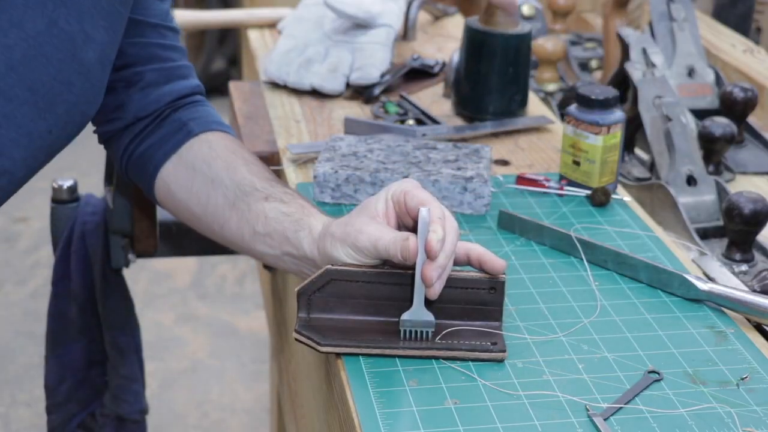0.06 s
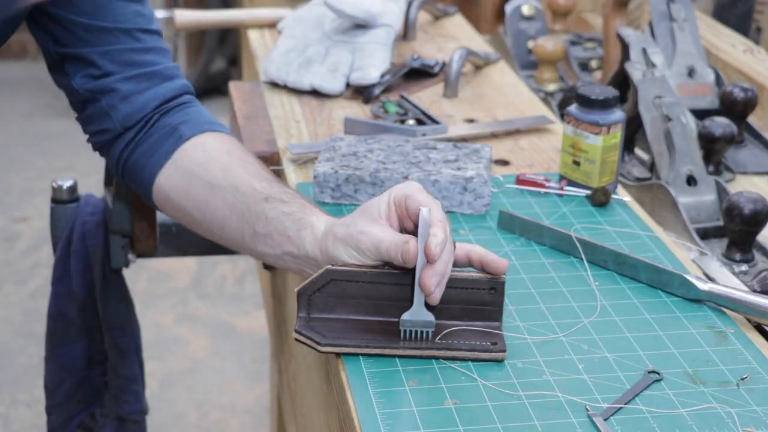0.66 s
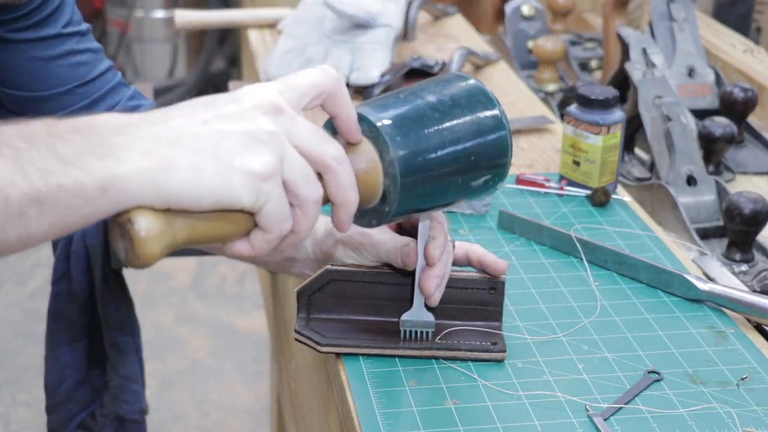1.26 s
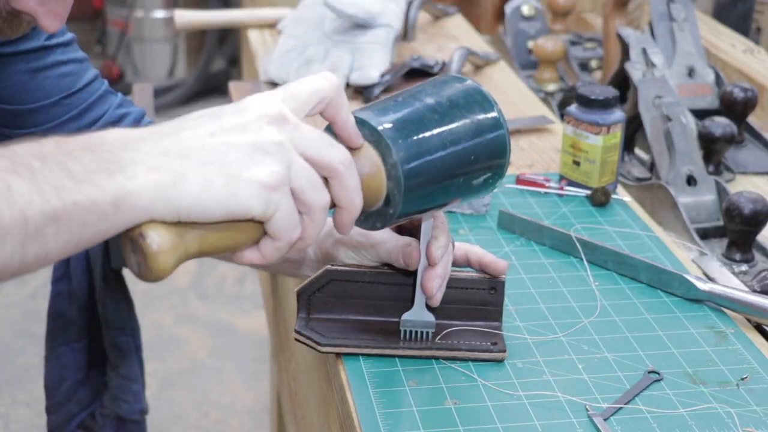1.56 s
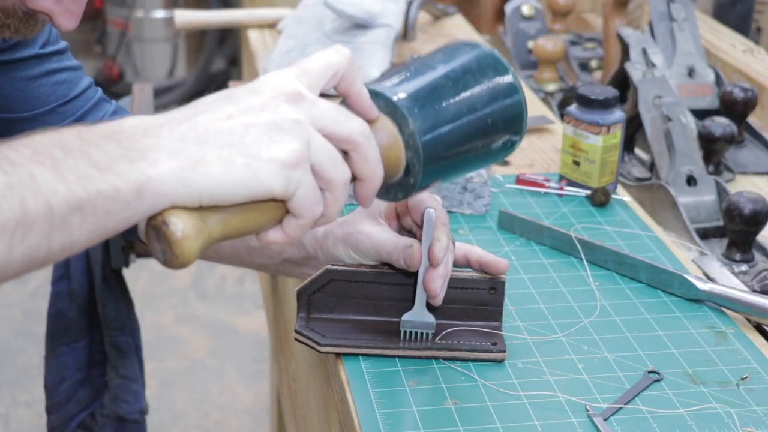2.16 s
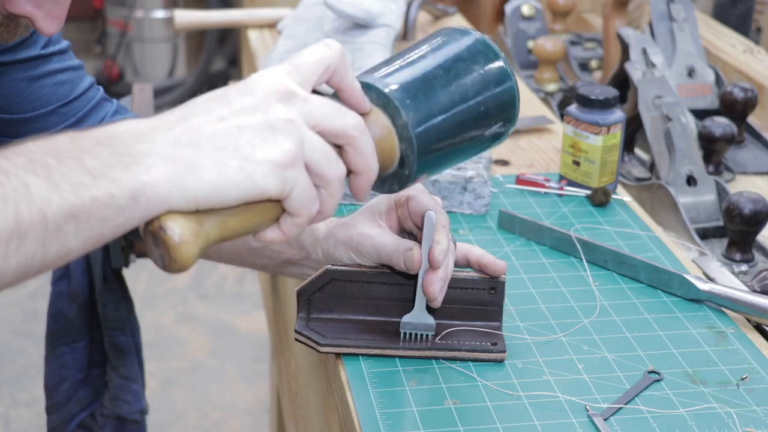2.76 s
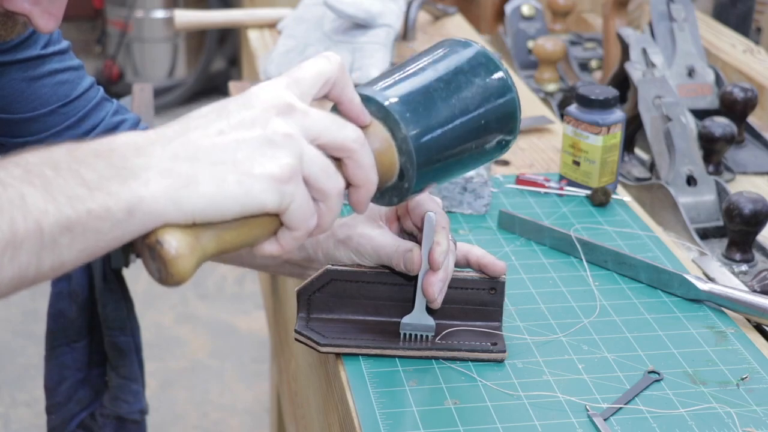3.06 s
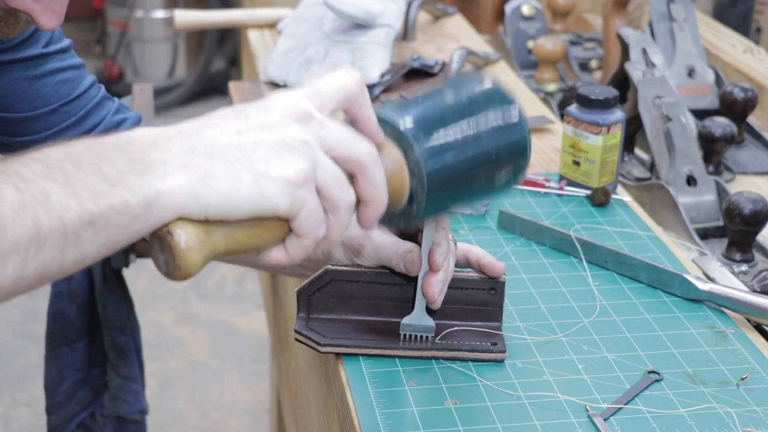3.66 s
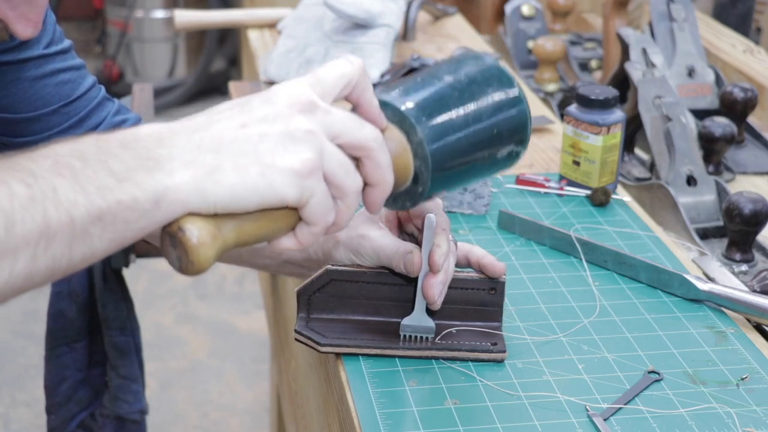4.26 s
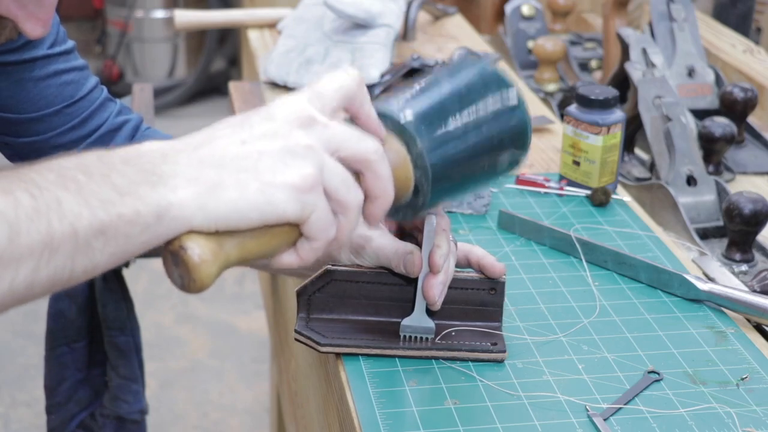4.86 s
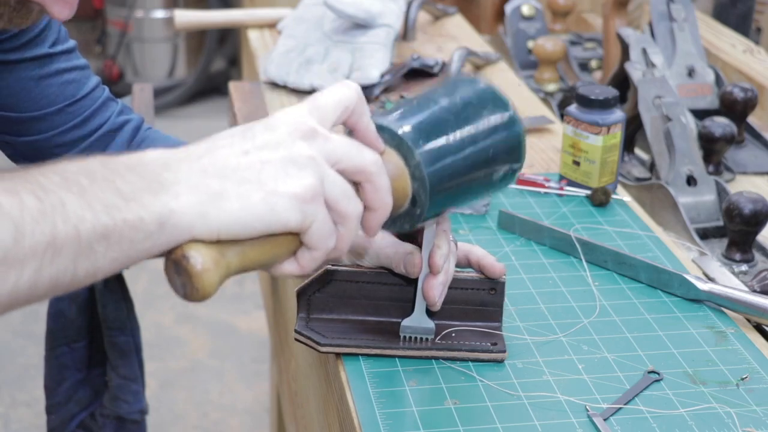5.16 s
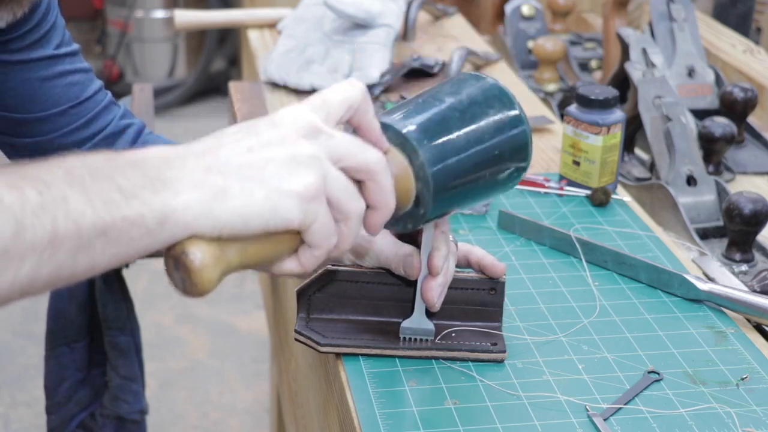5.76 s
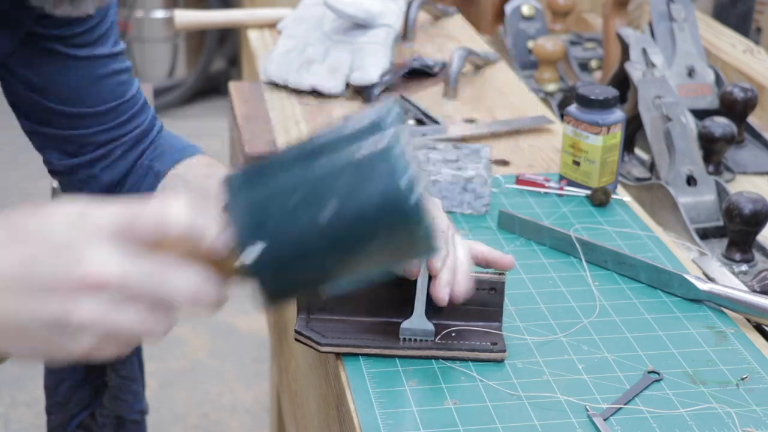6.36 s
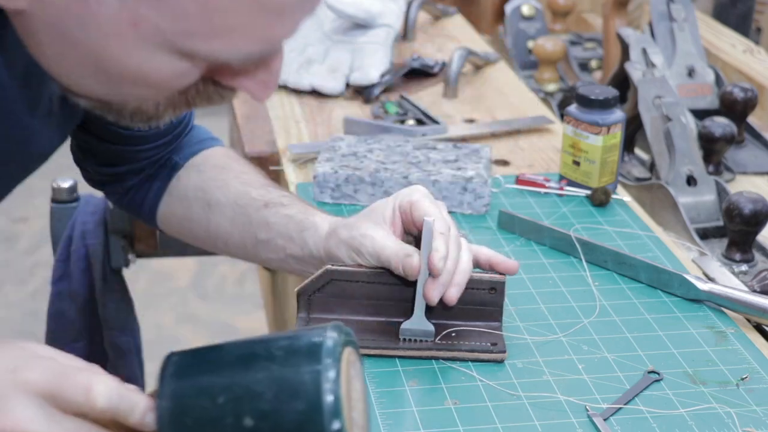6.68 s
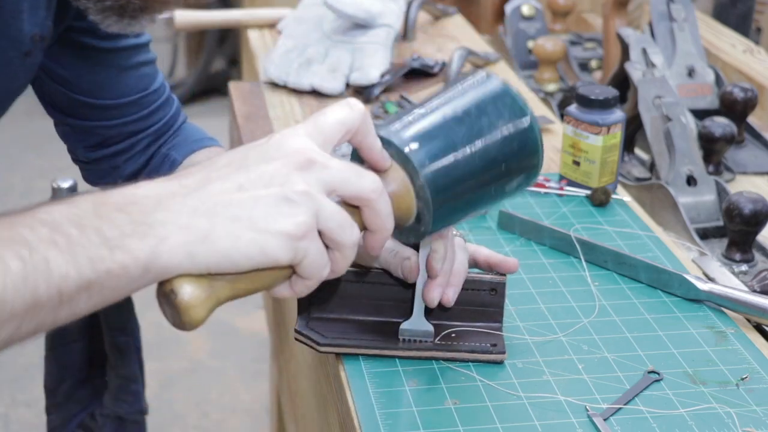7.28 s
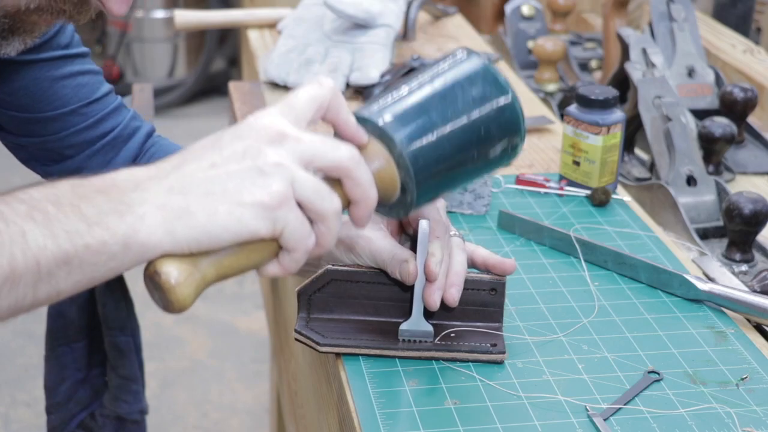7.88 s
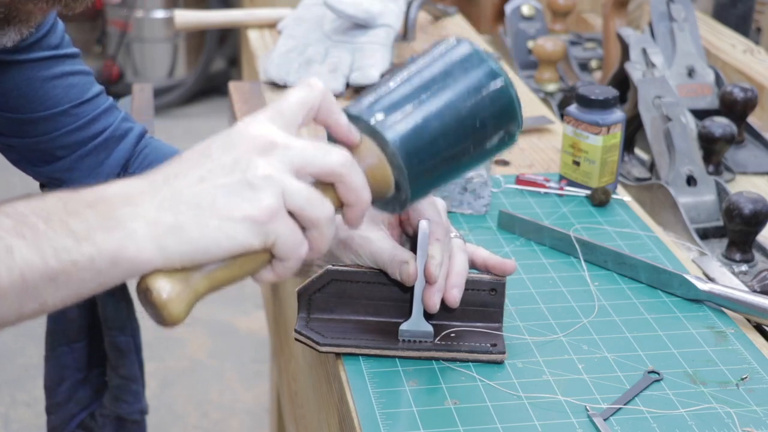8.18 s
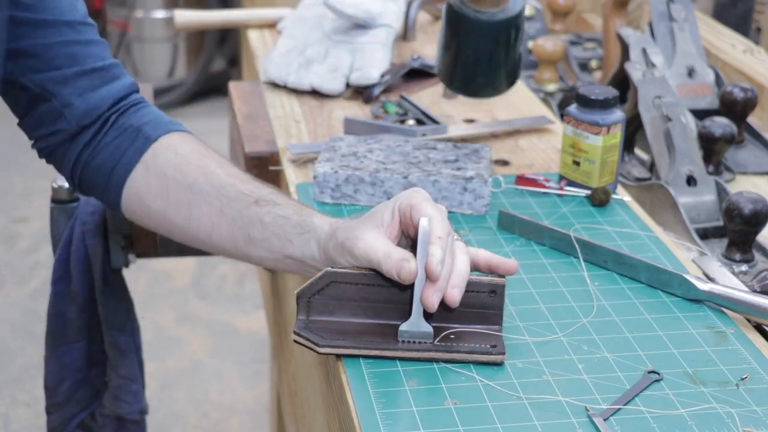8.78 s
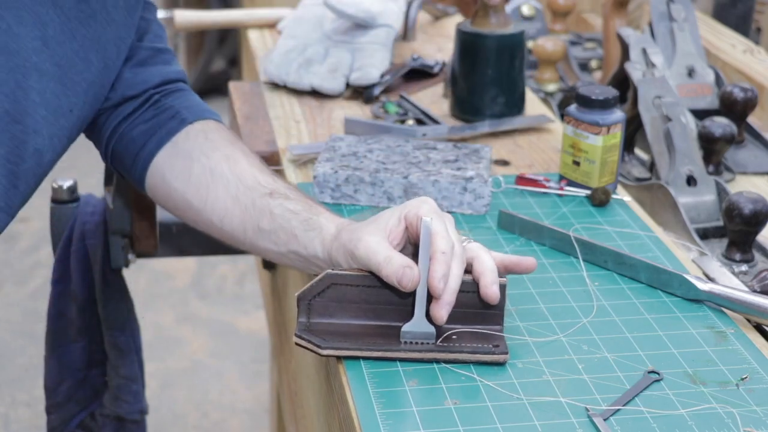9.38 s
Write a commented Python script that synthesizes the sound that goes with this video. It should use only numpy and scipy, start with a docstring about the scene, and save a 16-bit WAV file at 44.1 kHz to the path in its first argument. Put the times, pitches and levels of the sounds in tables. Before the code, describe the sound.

Sharp, steady mallet knocks on a chisel rattle tools on a wooden bench; four duller taps follow before the mallet is set down.

```python
"""A plastic-faced mallet taps a stitching chisel through leather: a long even run, a pause, four more.
Each impact excites damped modes of the chisel and the wooden workbench. As the prongs sink in, the bench
takes more of the blow and loose steel tools chatter on it; the hardest taps overload the microphone.
Friction makes sleeves rustle and the grip creak; at the end the mallet is set down among the tools.
The workshop reverberates, over steady room air and a low mains hum."""
import sys
import numpy as np
from scipy import signal
from scipy.fft import rfft, irfft, next_fast_len
from scipy.io import wavfile
from scipy.ndimage import uniform_filter1d

SR = 44100
rng = np.random.default_rng(int(sys.argv[2]) if len(sys.argv) > 2 else 0)


def wrap_up_sound(samples):
    """Save the sound to the file named by the first command line argument, as 16-bit audio."""
    columns = np.atleast_2d(samples).T
    # keep every value between -1 and 1, then stretch to whole-number steps
    tamed = np.clip(columns, -1, 1)
    steps = np.round(tamed * 32767).astype(np.int16)
    wavfile.write(sys.argv[1], SR, steps)


N = 420273

# mallet blows: t/s, force/dB, softness of the contact/dB
TAPS = [(1.3745,-22.5,-0.5), (1.6055,-13.5,-1), (1.8473,-12.5,0.5), (2.0886,-5,0), (2.3627,-2,-0.5),
        (2.6337,-1.5,-.5), (2.938,0,0.5), (3.227,-1.5,2), (3.4878,-.5,.5), (3.7501,-1.24,3), (3.9893,0,3),
        (4.2399,0.94,2.5), (4.4796,.5,2.5), (4.7186,-0.7,3), (4.9629,0.5,0), (5.23,0.17,1),
        (5.512,-0.64,2.5), (5.7893,-0.43,2), (6.0615,1,-1), (7.379,-9.5,7.5), (7.6445,-5,4), (7.892,-2,5.5),
        (8.1445,-2.5,5)]
# relative level of each part: base/dB, then dB per dB of force, per dB of softness, per thickness sunk
KNOCK_LAW = (0.5, 0.94, -0.39, -0.81)
CRACK_LAW = (1.47, 1.75, -0.55, -0.18)
CLICK_LAW = (-1, 2.5, -0.7, -5)
THUMP_LAW = (-19.5, 0.78, 1.44, 1.2)
CLATTER_LAW = (-25, 1.65, 0.12, 9)
JINGLE_LAW = (-45.5, 1, 0.55, 8.5)


def taps(sink_per_tap=0.077):
    """Impact excitation: each blow sinks the prongs and passes more energy to the bench and tools."""
    out, walls = np.zeros(N), room_tail()
    depth = 0  # in leather thicknesses: beyond 1 the prongs enter the mat below
    laws = np.array([KNOCK_LAW, CRACK_LAW, CLICK_LAW, THUMP_LAW, CLATTER_LAW, JINGLE_LAW])
    for s, force_db, softness_db in TAPS:
        depth += sink_per_tap * amp(force_db)
        levels = laws @ [1, force_db, softness_db, depth]
        knock_db, crack_db, click_db, thump_db, clatter_db, jingle_db = levels
        add(out, s, in_room(chisel(knock_db, crack_db, depth), walls, wet_db=-9))
        add(out, s, overload_click(click_db, depth))
        add(out, s, in_room(bench(thump_db, knock_db, depth), walls, wet_db=-16))
        add(out, s, in_room(chatter(clatter_db, jingle_db), walls, wet_db=-1))
    return out


# modes of the mallet head on the hand-damped chisel: f/Hz, level/dB, T60/s
CRACK_MODES = [(840, -11.5, 0.0077), (1050, -2.5, 0.0042), (1326, 0, 0.0077), (1543, 1, 0.0098),
               (1903, -12.5, 0.009), (2730, -4, 0.0055), (4380, -3.5, 0.0023), (5280, -17.5, 0.0074)]


def chisel(knock_db, crack_db, depth, contact_s=0.00041):
    """Damped free vibration: a hollow knock and a short crack build up over the contact time."""
    t = ring_time()
    knock_hz = 593 - 36 * depth
    knock = amp(knock_db - 1) * ring([(knock_hz, 0, 0.022)], scatter_db=0)
    pitch = 1 - 0.55 * max(depth - 1, 0)  # the crack drops as the prongs enter the mat
    tilt = max(0.32 * crack_db, -4)  # dB/octave: a harder contact is shorter and brighter
    modes = [(hz * pitch, db + tilt * np.log2(hz / 1300), t60) for hz, db, t60 in CRACK_MODES]
    crack = amp(crack_db + 2) * ring(modes, scatter_db=5)
    return (crack - knock) * (1 - np.exp(-(t / contact_s) ** 2))


# bright partials of the overload click: f/Hz, level/dB, T60/s
CLICK_PARTIALS = [(3960, -15, 0.0039), (8750, -4.5, 0.00082), (13800, -27, 0.0011)]


def overload_click(click_db, depth, fade_depth=0.095, late_db=-21.5):
    """Overload: a sharp, bright click on the hardest taps, weaker on the later ones."""
    late = np.clip((depth - 1) / fade_depth, 0, 1)
    return amp(click_db + late_db * late + 2.5) * ring(CLICK_PARTIALS, scatter_db=2)


# the bench top yielding under the prongs: f/Hz at zero depth, level/dB, T60/s
PUSH_MODES = [(127, -8, 0.05), (142.4, 4, 0.077)]
# long modes of the bench, the five booming ones first: f/Hz, level/dB, T60/s
BENCH_MODES = [(118, 3, .32), (131, -5, .15), (187, -7, .2), (217, -13, .22), (312, -9, .22),
               (274, -13, .2), (420, -9, .3), (522, -9, .3), (565, -1, .33), (619, -2, .3), (707, -11, .3),
               (952, -9, .33), (1141, -10, .3), (1160, -11, .33), (1239, -14, .3), (1374, -14, .3),
               (1579, -13, .3)]


def bench(thump_db, knock_db, depth, low_cut_hz=110, boom_limit_db=-17):
    """Plate vibration: the top yields, more stiffly as the prongs sink, and rings in its long modes."""
    pitch = 1 + 0.2 * depth
    stiffened = [(hz * pitch, db, t60) for hz, db, t60 in PUSH_MODES]
    push = amp(thump_db + 3.5) * ring(stiffened, scatter_db=2)
    boom_db = min(thump_db, boom_limit_db)  # leaning on the bench damps a bigger boom
    boom = amp(boom_db - 0.5) * ring(BENCH_MODES[:5], scatter_db=0.5)
    wood = amp(knock_db - 26) * ring(BENCH_MODES[5:], scatter_db=4)
    top = -(push + boom + wood) * (1 - np.exp(-ring_time() / 0.005))
    radiation = signal.butter(2, low_cut_hz, 'high', fs=SR, output='sos')
    return signal.sosfilt(radiation, top)  # an open plank radiates no deep bass


# tool bodies knocking on the wood: f/Hz, spectral level/dB
CLATTER_SPECTRUM = [(120, -30), (200, -13), (300, -5), (420, -2), (560, 0), (900, 0), (1300, -6),
                    (2000, -14), (3000, -19), (4800, -26), (7200, -38), (16000, -56)]
# resonances of the loose steel tools: f/Hz, bandwidth/Hz, level/dB
STEEL_RESONANCES = [(3140, 190, 13.5), (3800, 200, -13.5), (4720, 280, 7.5), (5630, 690, 9),
                    (5500, 120, -17.5), (6040, 160, -8.5), (7500, 37, -6), (8516, 30, -37), (9200, 500, -2),
                    (11300, 43, -25.5), (11000, 200, -11.5), (12430, 60, -21), (12600, 300, -21.5),
                    (13680, 310, -27)]


def chatter(clatter_db, jingle_db, delay_s=0.0049):
    """Contact rattle: loose tools jump with the bench and settle in a dense, uneven run of impacts."""
    t = ring_time()
    contacts = unit(amp(4 * flutter(len(t), span=130)))
    contacts *= 1 - np.exp(-(t / delay_s) ** 4)
    clatter = noise(CLATTER_SPECTRUM, len(t)) * contacts * fade(t, t60=0.13)
    tilt = 0.582 * min(jingle_db + 30, 0)  # dB/octave: tools that barely lift off land softly
    steel = lambda hz: resonances(STEEL_RESONANCES)(hz) * amp(tilt * np.log2(np.maximum(hz / 5000, 1)))
    strikes = rng.standard_normal(len(t)) * contacts * fade(t, t60=0.14)
    return amp(clatter_db + 5) * clatter + amp(jingle_db + 8.5) * filtered(strikes, steel)


# slides and squeaks of the mallet on the bench: peak t/s, level/dB, rise/s, fall/s
DRAGS = [(9.09, -29, .015, 0.061), (9.15, -19.5, .018, 0.015), (9.382, -17, .008, .04),
         (9.5, -24, 0.1, 0.068)]
SQUEAKS = [(9.119, -36.5, 0.0037, .005), (9.149, -25.5, .005, .006)]
# resonances that each excites: f/Hz, bandwidth/Hz, level/dB
DRAG_RESONANCES = [(345.3, 120, -3.5), (400, 66, 22.5), (770, 290, 21), (1076, 120, 12.5),
                   (1690, 250, -8.5), (2470, 170, 4), (3560, 170, -18), (4670, 250, -48), (5270, 350, -21),
                   (7200, 500, -39)]
SQUEAK_RESONANCES = [(5350, 300, 1), (7100, 400, -5), (9200, 350, -8)]


def mallet_slide(judder_db=4):
    """Sliding friction: the mallet drags and squeaks, driving resonances with noise."""
    slips = amp(judder_db * flutter(N, span=100)) * rng.standard_normal(N)
    scrape = unit(filtered(slips, resonances(DRAG_RESONANCES)))
    squeak = unit(filtered(rng.standard_normal(N), lambda hz: resonances(SQUEAK_RESONANCES)(hz) ** 2))
    return amp(-4) * swells(DRAGS) * scrape + swells(SQUEAKS) * squeak


# contacts of the mallet as it is set down: t/s, level/dB, T60/s
LANDINGS = [(9.078, -32, .06), (9.116, -26, .03), (9.138, -25, .03), (9.147, -22, .025), (9.168, -19, .04),
            (9.364, -14, .03), (9.371, -17, .03), (9.411, -12, .035), (9.429, -23, .02)]
# its wooden clack: f/Hz, spectral level/dB
CLACK_SPECTRUM = [(100, -43), (200, -14.5), (400, -10.5), (800, 1.5), (1250, -5.5), (2300, -6.5),
                  (3000, -10.5), (5200, -12.5), (6400, -20), (11000, -31.5), (16000, -59.5)]
# modes of the tools it hits: f/Hz, level/dB, T60/s
TOOL_MODES = [(958, -8, .25), (1240, -9, .12), (1700, -5, .15), (2110, -3, .15), (2410, -2, .18),
              (2650, -5, .18), (3365, -4, .22), (3680, -6, .22), (3935, -7, .25), (4468, -6, .16),
              (5012, -11, .18), (5480, -10, .1), (6616, -15, .14), (7806, -19, .22), (10050, -18, .17)]


def mallet_down(rise_s=0.00073):
    """Broadband impacts: head and handle clack down and set the neighbouring tools ringing."""
    out, t = np.zeros(N), ring_time()
    for s, db, t60 in LANDINGS:
        clack = amp(db + 7.5) * noise(CLACK_SPECTRUM, len(t)) * fade(t, t60)
        tools = amp(db - 12) * ring(TOOL_MODES, scatter_db=2)
        add(out, s, (clack + tools) * (1 - np.exp(-t / rise_s)))
    return out


# soft bumps on the bench: t/s, level/dB, cutoff f/Hz
BUMPS = [(0.122, -15, 430), (0.136, -31, 403), (0.166, -37, 300), (.636, -34, 600), (1.266, -29, 910),
         (9.333, -13.5, 386)]
# modes of the bench under a bump: f/Hz, level/dB, T60/s
THUD_MODES = [(127, -13, 0.11), (169, -5, 0.043), (277, -6, 0.048), (421, 2, 0.023), (680, -15, .02),
              (1000, -21, 0.013)]


def bumps(rise_s=0.0044):
    """Low-pass excitation: a soft contact drives mainly the bench modes below its cutoff."""
    out, t = np.zeros(N), ring_time()
    for s, db, cutoff_hz in BUMPS:
        modes = [(hz, level - 10 * np.log10(1 + (hz / cutoff_hz) ** 4), t60)
                 for hz, level, t60 in THUD_MODES]
        add(out, s, amp(db) * ring(modes, scatter_db=1.5) * (1 - np.exp(-t / rise_s)))
    return out


def creak(start_s=1.095, first_gap_s=0.042, gap_ratio=0.67, count=9):
    """Stick-slip: the tightening grip slips ever faster and higher. Gives rows of t/s, level/dB, f/Hz."""
    k = np.arange(count)
    gaps = first_gap_s * gap_ratio ** k
    level_db = -43 + 4 * np.sin(np.pi * k / (count - 1))
    pitch_hz = 1750 + 55.5 * k
    return list(zip(start_s + np.cumsum(gaps) - gaps, level_db, pitch_hz))


# small ticks of handling: t/s, level/dB, f/Hz
TICKS = [(.384, -42, 6060), (1.269, -36, 1800), (6.429, -39.5, 1970), (6.702, -44.5, 1750),
         (7.243, -47.5, 3500)]


def ticks_and_creak():
    """Friction transients: each tick or slip of the grip is a decaying burst of band noise."""
    out, t = np.zeros(N), ring_time()
    for s, db, hz in TICKS + creak():
        slip = noise([(hz / 5, -25), (hz, 0), (2 * hz, -12), (4 * hz, -35)], len(t))
        add(out, s, amp(db) * slip * fade(t, t60=0.025))
    return out


# strokes of the sleeve, and the palm turning on the handle: peak t/s, level/dB, rise/s, fall/s
SLEEVE_STROKES = [(.25, -46, .03, .025), (.45, -59, 0.96, 1), (.618, -40.5, .025, 0.055),
                  (.76, -50.5, .015, 0.032), (6.42, -54, 0.53, .27), (8.47, -46.5, 0.042, .12),
                  (8.93, -52, 0.082, 0.073), (9.08, -40, 0.054, 0.085)]
PALM_TURNS = [(1.27, -39.5, 0.087, .08)]
# rubbing cloth and skin: f/Hz, spectral level/dB
CLOTH_SPECTRUM = [(120, -50.5), (200, -16), (380, -13), (590, -7.5), (1370, -5.5), (2290, -10.5),
                  (3560, -6.5), (3900, -6.5), (16000, -36.5)]
PALM_SPECTRUM = [(500, -13), (1200, -0.5), (1900, 3.5), (3000, -2.5), (5000, -10), (9000, -28)]


def rustle():
    """Friction noise: sleeve and palm rub in swells, grainy as the surfaces catch and let go."""
    grain_db = 2 * flutter(N, span=200)
    sleeve = swells(SLEEVE_STROKES) * amp(grain_db + 1.5) * noise(CLOTH_SPECTRUM, N)
    palm = swells(PALM_TURNS) * amp(grain_db - 6.5) * noise(PALM_SPECTRUM, N)
    return sleeve + palm


# reverberation time of the workshop: f/Hz, T60/s
ROOM_T60 = [(100, 0.55), (500, 0.37), (1500, 0.43), (4000, 0.42), (8000, 0.32), (15000, 0.08)]
# colour of its echo: f/Hz, level/dB
ROOM_COLOUR = [(60, -16), (130, 9), (300, 7), (600, -8), (1000, -4.5), (1500, -7), (3000, -6.5), (7000, -8),
               (15000, -0.5)]


def room_tail(gap_s=0.002, build_s=0.014, hold_s=0.059):
    """Reverberation of energy 1: near walls hold it level for a moment, then each band dies away."""
    hz, t, bands = signal.stft(rng.standard_normal(SR * 3 // 4), SR, nperseg=256)
    decay = fade(np.maximum(t - hold_s, 0), along(ROOM_T60, hz)[:, None])
    colour = amp(along(ROOM_COLOUR, hz))[:, None]
    tail = signal.istft(bands * decay * colour, SR, nperseg=256)[1]
    tail *= np.clip((np.arange(len(tail)) / SR - gap_s) / build_s, 0, 1)
    return tail / np.linalg.norm(tail)


def in_room(x, tail, wet_db):
    """Convolution: the direct sound plus its echo."""
    out = amp(wet_db) * signal.fftconvolve(x, tail)
    out[:len(x)] += x
    return out


# workshop air: f/Hz, spectral level/dB
AIR_SPECTRUM = [(12, -89), (20, -30), (43, -25), (65, -49), (88, -11.5), (123, -9), (204, -15), (262, -8.5),
                (293, -14.5), (446, -15.5), (485, -17), (1910, -26), (16000, -32.5)]
# mains harmonics: f/Hz, rms level/dB
HUM_PARTIALS = [(59.5, -59), (119, -61)]


def background(air_db=-55):
    """Stationary sound: the continuous spectrum of room air and the line spectrum of mains hum."""
    t = np.arange(N) / SR
    hum = sum(amp(db) * np.sqrt(2) * np.sin(2 * np.pi * (hz * t + rng.random()))
              for hz, db in HUM_PARTIALS)
    return amp(air_db) * noise(AIR_SPECTRUM, N) + hum


def amp(db):
    """Decibels to gain."""
    return 10 ** (np.asarray(db) / 20)


def unit(x):
    """Normalisation to rms 1."""
    return x / np.sqrt(np.mean(x ** 2) + 1e-20)


def along(points, hz):
    """Interpolation of (f/Hz, value) points on a log frequency axis."""
    f, v = np.transpose(points)
    return np.interp(np.log(hz + 1), np.log(f + 1), v)


def filtered(x, response):
    """Linear filtering: the spectrum of x times a frequency response."""
    n = x.shape[-1]
    padded = next_fast_len(n + SR // 4)
    hz = np.fft.rfftfreq(padded, 1 / SR)
    return irfft(rfft(x, padded) * response(hz), padded)[..., :n]


def noise(spectrum, size):
    """Spectral shaping: coloured noise of rms 1."""
    return unit(filtered(rng.standard_normal(size), lambda hz: amp(along(spectrum, hz))))


def flutter(size, span):
    """Random modulation of rms 1: noise averaged over span samples."""
    return unit(uniform_filter1d(rng.standard_normal(size), size=span))


def ring_time():
    """Time axis of one blow, t/s."""
    return np.arange(SR // 2) / SR


def fade(t, t60):
    """Exponential decay, 60 dB in t60."""
    return np.exp(-np.log(1000) * t / t60)


def ring(modes, scatter_db):
    """Sum of damped sines (f/Hz, level/dB, T60/s) at randomly scattered strengths."""
    t = ring_time()
    return sum(amp(db + scatter_db * rng.standard_normal()) * np.sin(2 * np.pi * hz * t) * fade(t, t60)
               for hz, db, t60 in modes)


def resonances(modes):
    """Frequency response of parallel resonators (f/Hz, bandwidth/Hz, level/dB)."""
    return lambda f: sum(amp(db) * 1j * f * width / (hz * hz - f * f + 1j * f * width)
                         for hz, width, db in modes)


def swells(rows):
    """Gaussian envelopes of strokes (peak t/s, level/dB, rise/s, fall/s)."""
    t = np.arange(N) / SR
    return sum(amp(db) * np.exp(-((t - s) / np.where(t < s, rise, fall)) ** 2)
               for s, db, rise, fall in rows)


def add(track, s, sound):
    """Superposition: mix a sound into the track at time s."""
    start = max(round(s * SR), 0)
    track[start:start + len(sound)] += sound[:N - start]


def scene():
    """Superposition of all sources at one microphone, which feeds both channels."""
    mono = taps()
    mono += in_room(mallet_slide() + mallet_down(), room_tail(), wet_db=-5)[:N]
    mono += in_room(bumps() + ticks_and_creak() + rustle(), room_tail(), wet_db=-5)[:N]
    mono += background()
    return np.array([mono, mono])


def record(dry, hiss_db=-71, top_hz=16000):
    """Saturation: the input clips at full scale; each channel gains faint hiss and is band-limited."""
    clipped = np.clip(dry, -1, 1)
    hiss = amp(hiss_db) * rng.standard_normal(dry.shape)
    return filtered(clipped + hiss, lambda hz: hz < top_hz)


dry = scene()
out = record(dry)
wrap_up_sound(out)
```